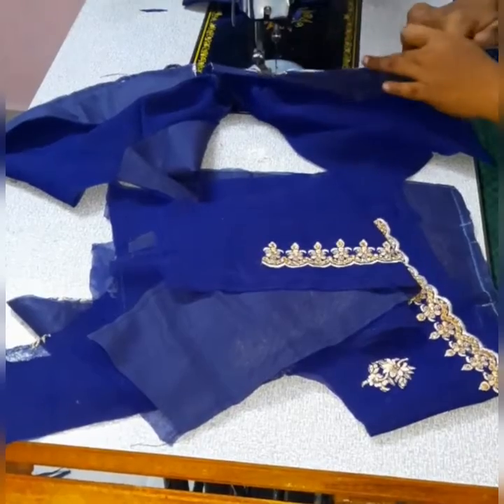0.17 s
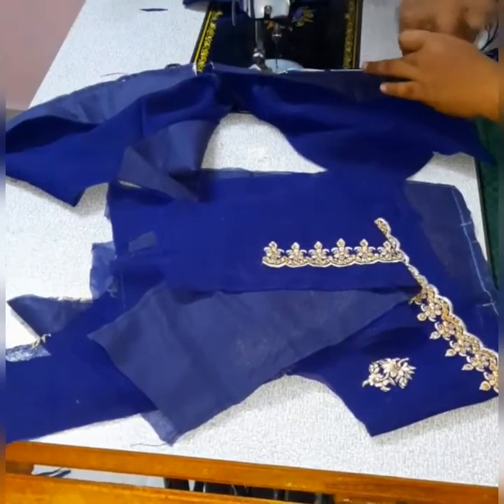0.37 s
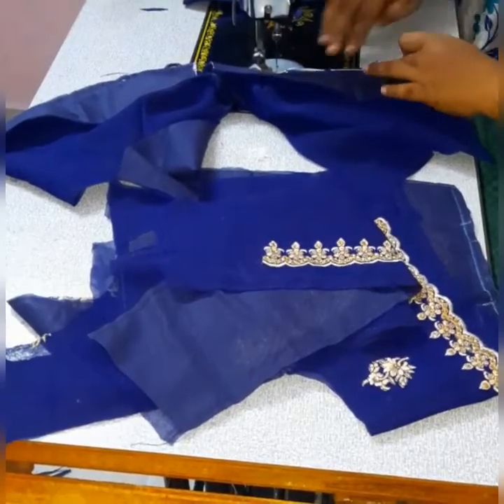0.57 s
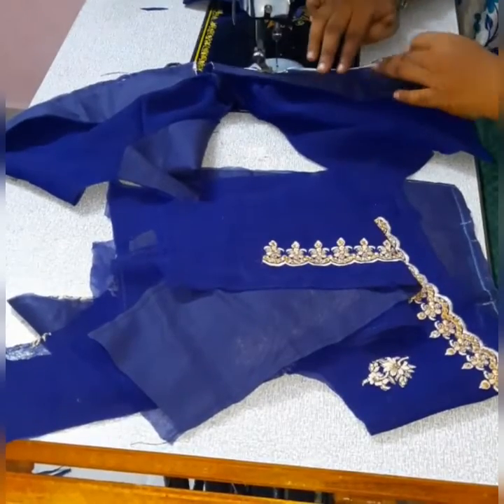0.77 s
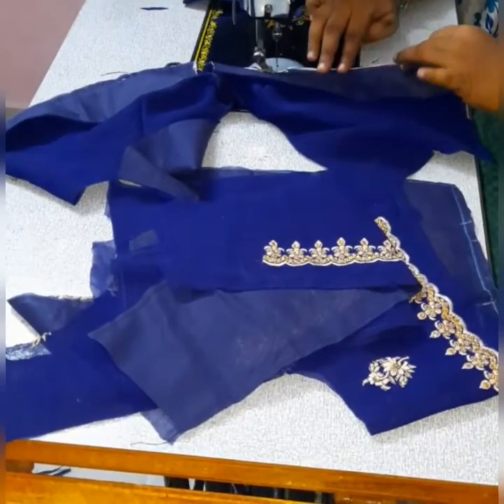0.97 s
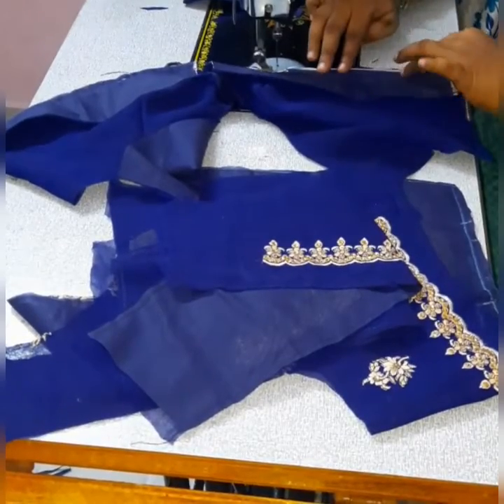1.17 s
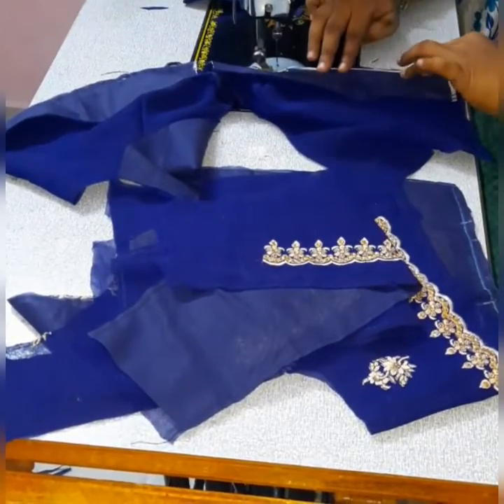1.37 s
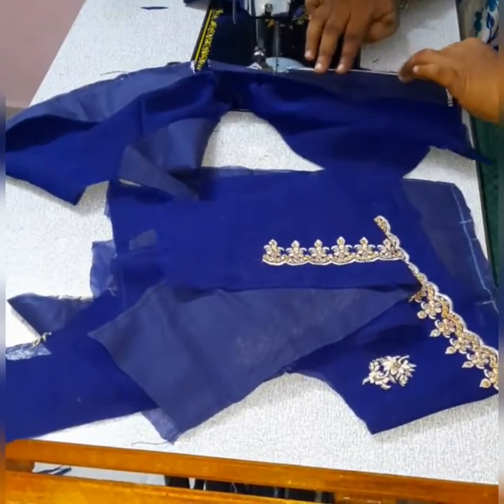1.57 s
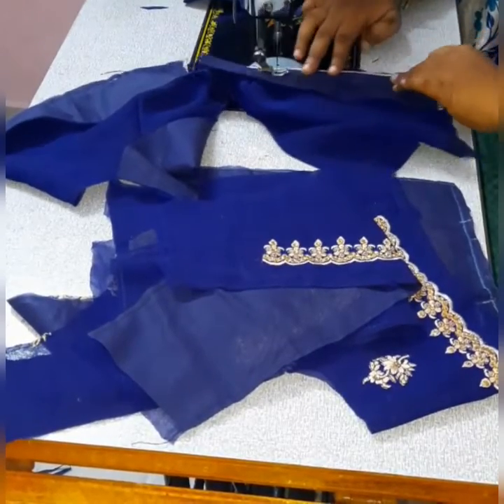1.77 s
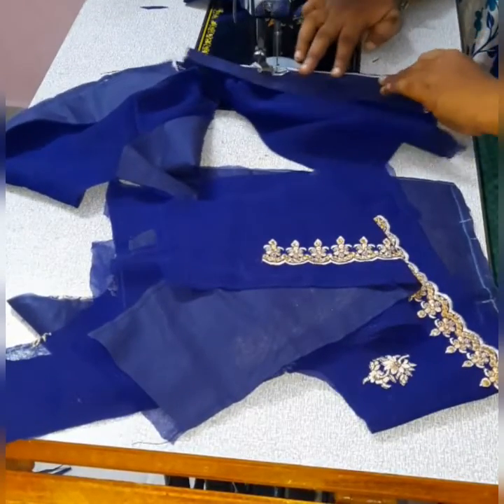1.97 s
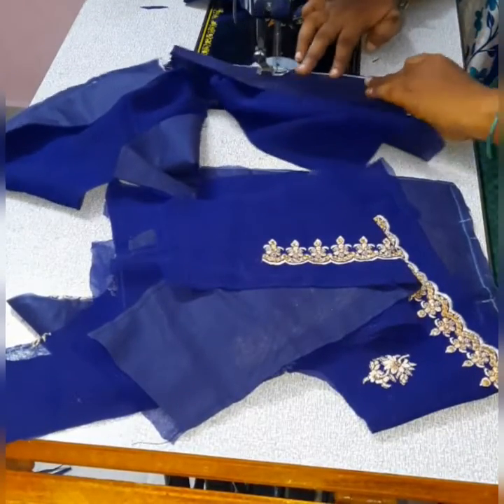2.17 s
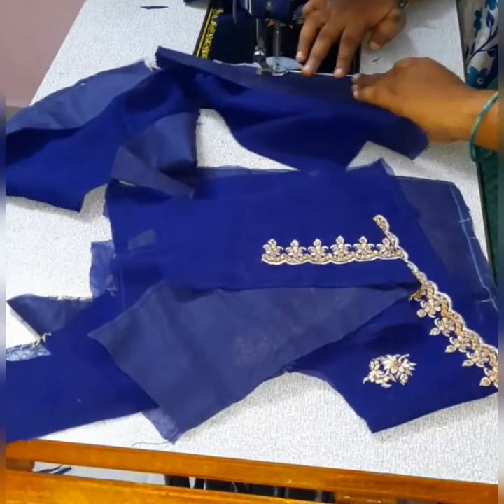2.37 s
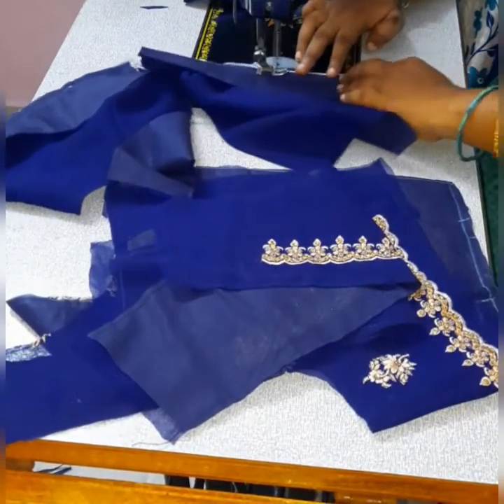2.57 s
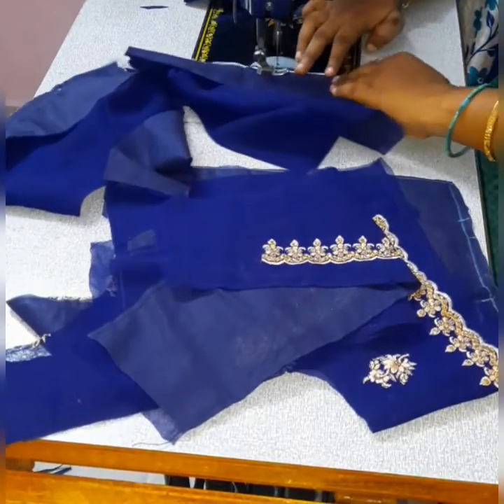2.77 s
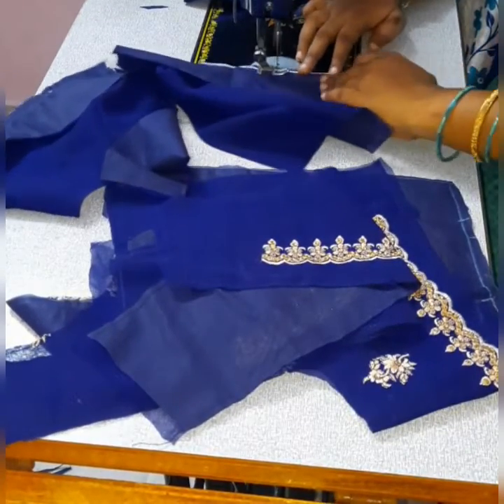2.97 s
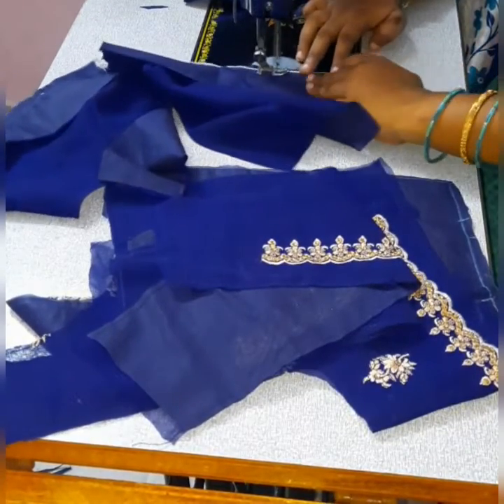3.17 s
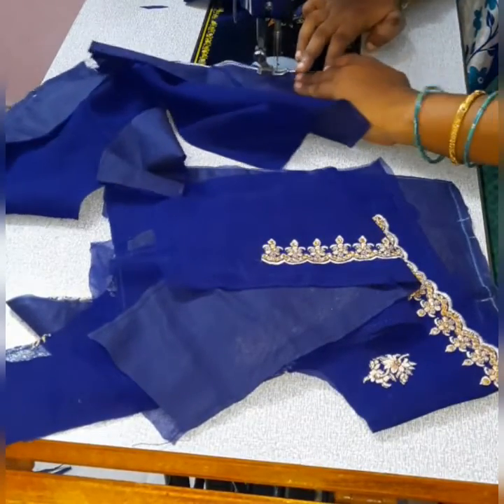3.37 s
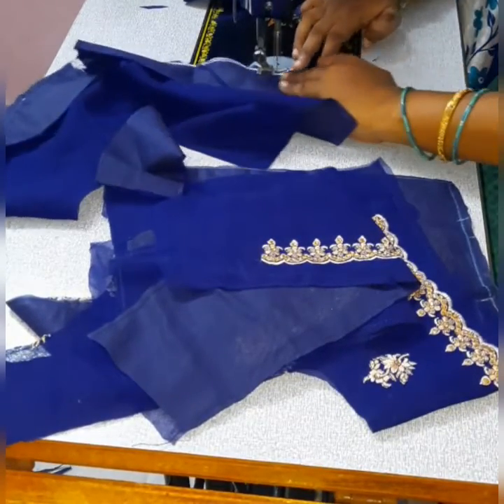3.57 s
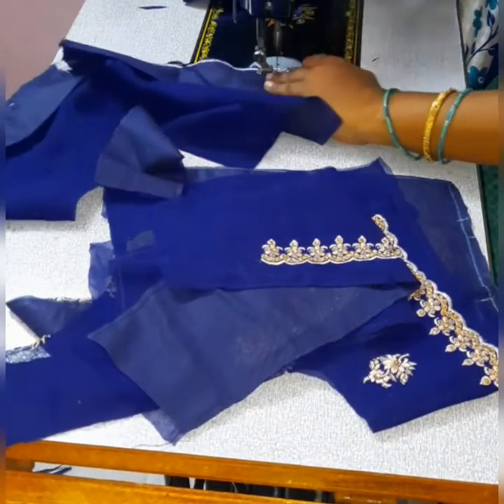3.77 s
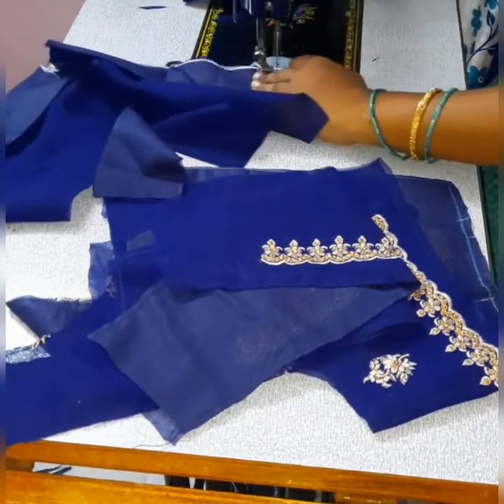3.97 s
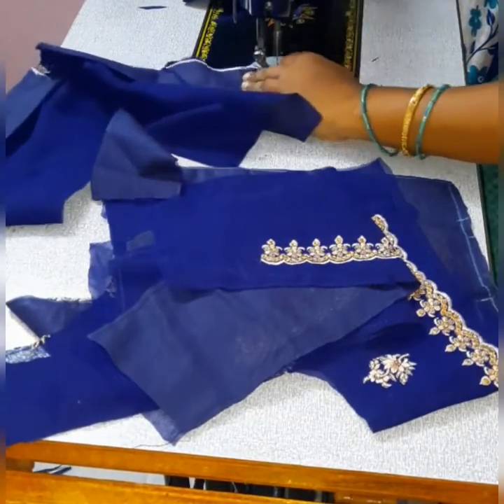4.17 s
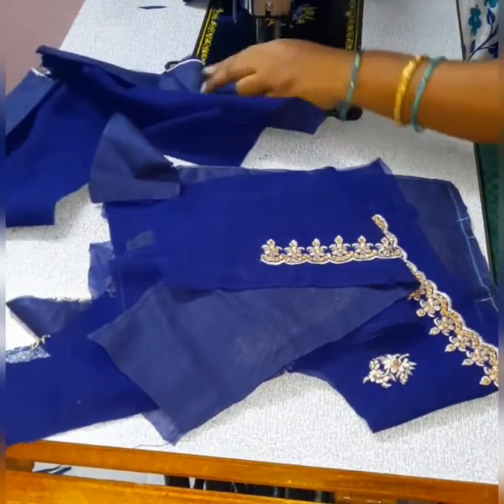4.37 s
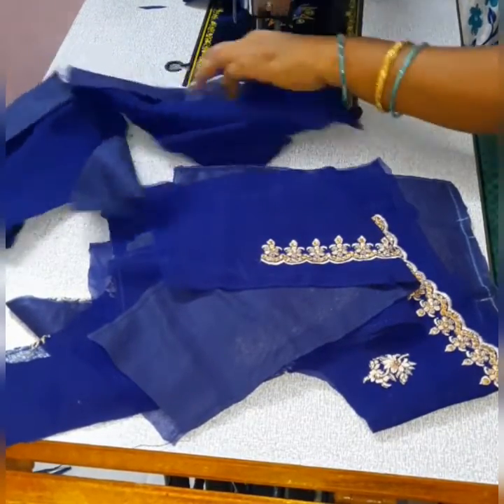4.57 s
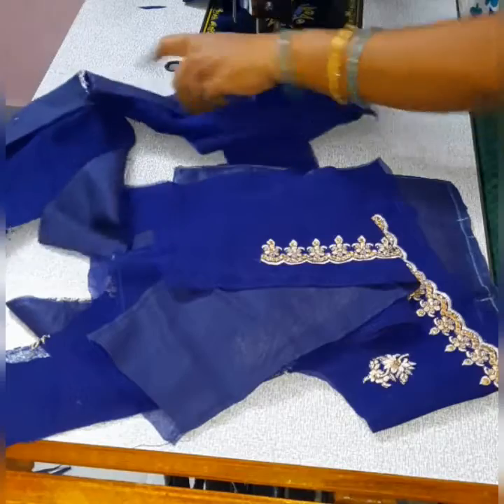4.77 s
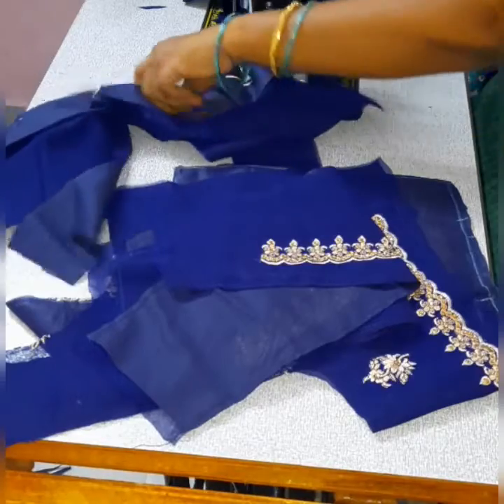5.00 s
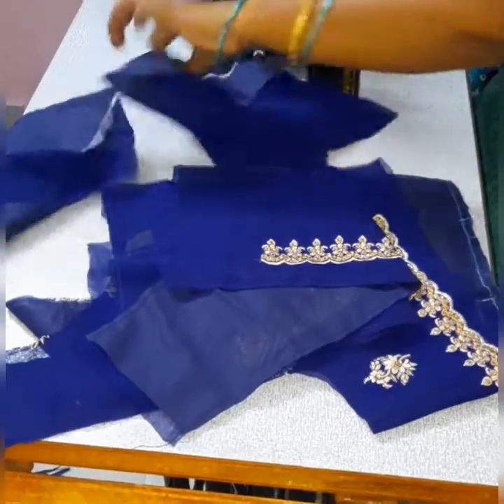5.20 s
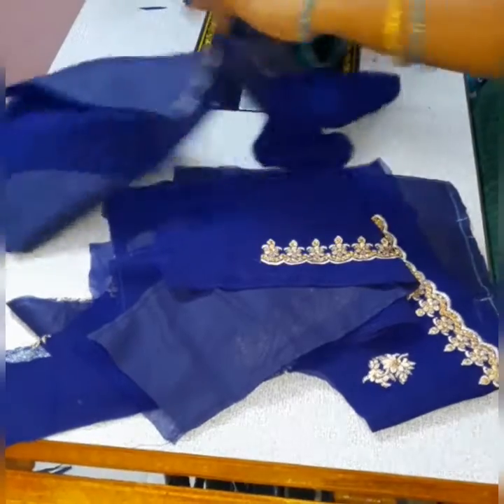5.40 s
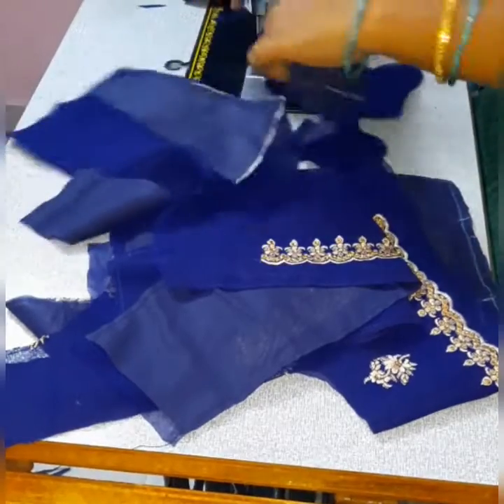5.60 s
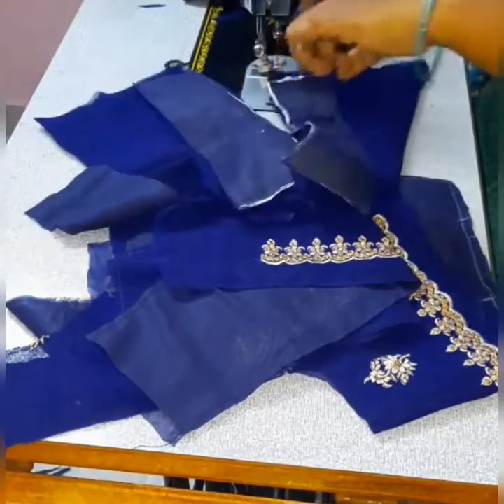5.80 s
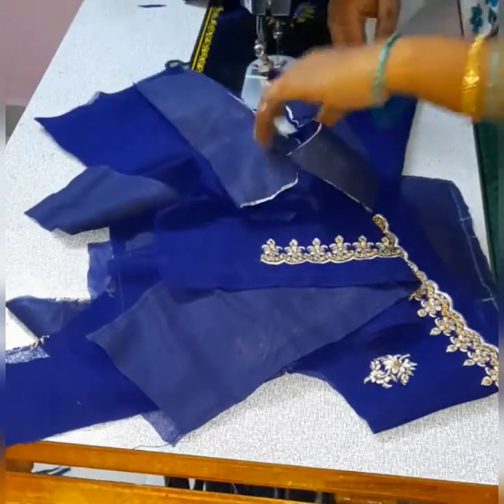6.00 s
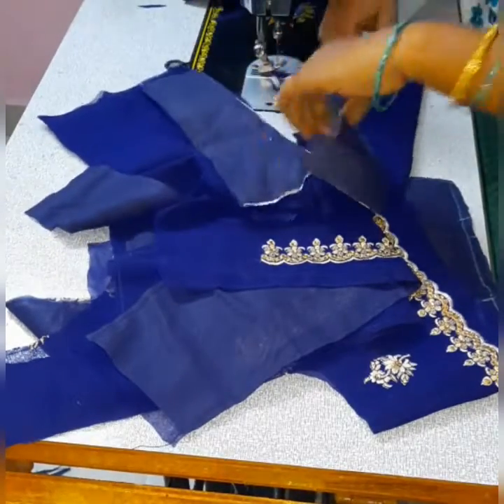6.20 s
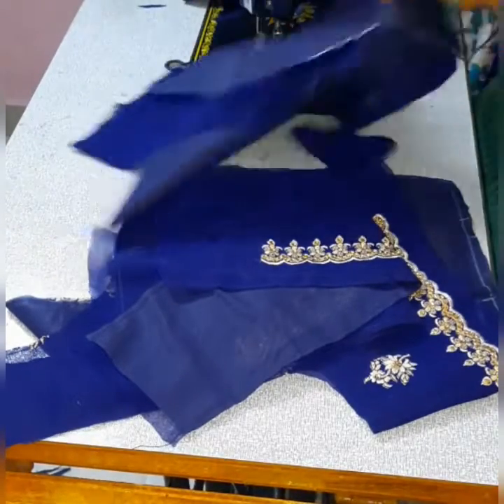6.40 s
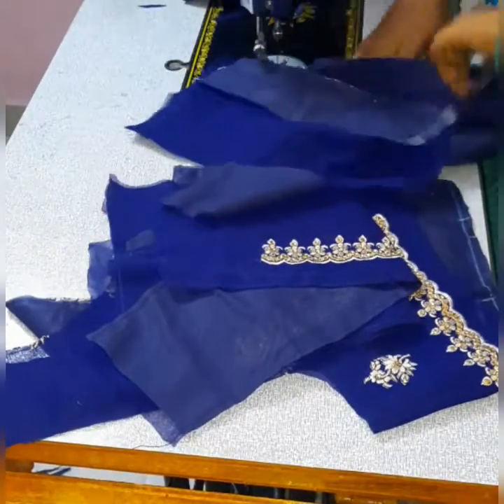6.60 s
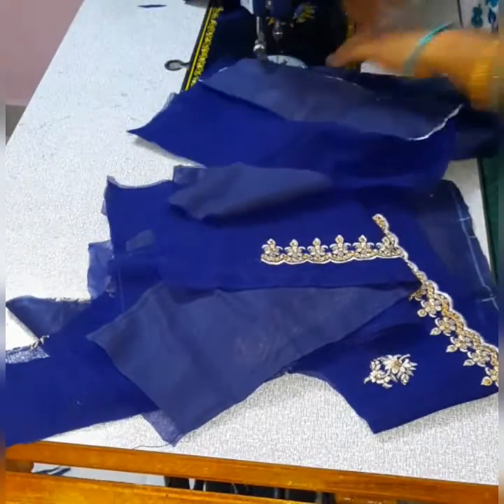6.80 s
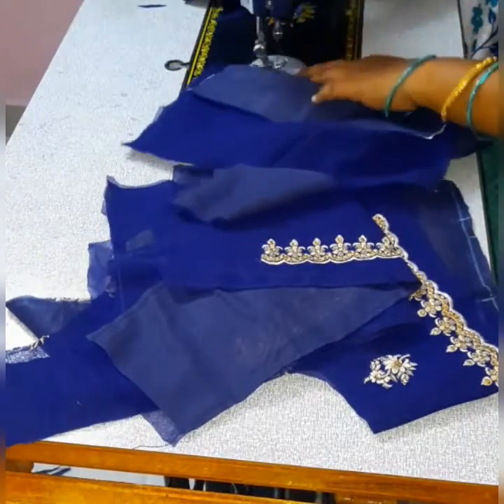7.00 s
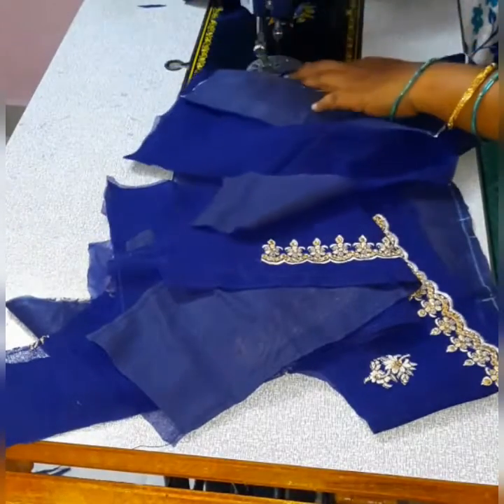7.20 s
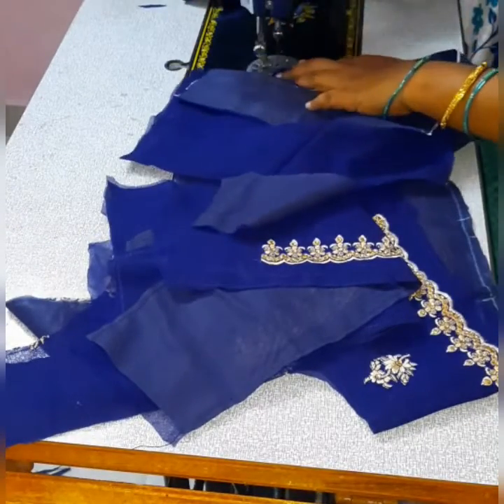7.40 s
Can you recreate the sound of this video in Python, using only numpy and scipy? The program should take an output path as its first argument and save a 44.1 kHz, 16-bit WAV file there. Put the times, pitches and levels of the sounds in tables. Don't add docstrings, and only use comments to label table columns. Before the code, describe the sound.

A foot-driven sewing machine runs one rough seam about two metres from a phone. Two soft wheel slaps precede it; then dense metallic ticking, wooden thumps and iron knocks rise and fall with the foot. It stops quickly, leaving a knee bump, a sharp lever snap, light bangle clinks, faint cloth crackle, low traffic hum, distant bird and insect notes, and slight hiss in a hard indoor space.

```python
import sys
import numpy as np
from scipy import signal
from scipy.fft import rfft, irfft, next_fast_len
from scipy.io import wavfile
from scipy.ndimage import uniform_filter1d

SR = 44100
rng = np.random.default_rng(int(sys.argv[2]) if len(sys.argv) > 2 else 0)


def field_ratio(decibels):
    return 10 ** (np.asarray(decibels, dtype=float) / 20)


def file_out(sig):
    cols = np.atleast_2d(sig).T
    lim = np.clip(cols, -1, 1)
    pcm = np.round(lim * 32767).astype(np.int16)
    wavfile.write(sys.argv[1], SR, pcm)


N = 328545
TIME = np.arange(N) / SR


def unit(x):
    return x / np.sqrt(np.mean(x ** 2))


def band(x, hz, kind):
    return signal.sosfilt(signal.butter(2, hz, kind, fs=SR, output="sos"), x)


def walk(rate):
    k = int(SR / rate)
    steps = np.repeat(rng.standard_normal(N // k + 1), k)
    return unit(uniform_filter1d(uniform_filter1d(steps, k), k)[:N])


def clicks(rate, spread_db):
    chance = rng.random(N) * SR / rate
    size = np.minimum(rng.exponential(size=N), 3.0)
    return (chance < 1) * np.sign(chance - .5) * field_ratio(spread_db * size)


def taps(s, db, slide_s=.001):
    force, t = np.zeros(N + SR), TIME[:SR // 8]
    grit = rng.standard_normal((len(s), len(t)))
    slide_s = np.maximum(np.broadcast_to(slide_s, len(s)), .0005)
    for k in range(len(s)):
        scrape = 0.14 * np.exp(-t / slide_s[k]) * grit[k]
        scrape[0] = 1
        force[int(s[k] * SR):][:len(t)] += field_ratio(db[k]) * scrape / np.sqrt(np.sum(scrape ** 2))
    return force[:N]


def swells(rows, edge_s, rest_db):
    power = field_ratio(2 * rest_db)
    for s, length, db in rows:
        rise = np.clip((TIME - s) / edge_s, 0, 1) ** 2
        fall = np.clip((s + length - TIME) / edge_s, 0, 1) ** 2
        power = power + field_ratio(2 * db) * rise * fall
    return np.sqrt(power)


def waver(hz, width, size, core=0):
    slow = unit(band(rng.standard_normal((2, size)), width / 2, "low"))
    phase = 2 * np.pi * np.cumsum(hz * np.ones(size)) / SR
    return unit((slow[0] + core) * np.cos(phase) + slow[1] * np.sin(phase))


def colour(points, size=4096):
    hz, db = np.transpose(points)
    gain = field_ratio(np.interp(np.log(np.fft.rfftfreq(size, 1 / SR) + 1), np.log(hz), db))
    cepstrum = irfft(np.log(gain))
    cepstrum[1:size // 2] *= 2
    cepstrum[size // 2 + 1:] = 0
    return irfft(np.exp(rfft(cepstrum)))


def pair(size):
    mid, side = rng.standard_normal((2, size))
    side = band(side, 474, "high") + 0.27 * side
    return np.array([mid + side, mid - side])


def steady(points):
    return unit(signal.fftconvolve(pair(N), colour(points)[None])[:, :N])


def ring(modes, path):
    t, out = TIME[:8192], 0
    power = np.mean(np.abs(rfft(path)) ** 2, axis=0)
    grid = np.fft.rfftfreq(path.shape[1], 1 / SR)
    for hz, width, db in modes:
        dip = np.average(power, weights=1 / (1 + (2 * (grid - hz) / width) ** 2))
        sine = np.exp(-np.pi * width * t) * np.sin(2 * np.pi * hz * t)
        out = out + field_ratio(db) * np.sqrt(width / dip) * sine
    lowest_hz = 0.82 * modes[0][0]
    return band(band(out, lowest_hz, "high"), lowest_hz, "high")


ROOM_T60_LOW_S, ROOM_T60_HIGH_S, ROOM_SPLIT_HZ, TAIL_FADE_S = 0.58, 0.55, 1400, 0.94


def heard(force, body, direct_db=-12, left_db=3.0, reach=0.8, count=3):
    t, size, total = TIME[:SR * 2 // 5], next_fast_len(N + SR), 0
    spot = rng.integers(count, size=N // 64 + 1).repeat(64)[:N]
    for k in range(count):
        echoes = pair(len(t)) * field_ratio(-150 * t * (1 / reach - 1))
        low = band(echoes, ROOM_SPLIT_HZ, "low")
        path = low * field_ratio(-60 * t / ROOM_T60_LOW_S) + (echoes - low) * field_ratio(-60 * t / ROOM_T60_HIGH_S)
        path = path * field_ratio(-10 * (t / TAIL_FADE_S) ** 2)
        path = path / np.sqrt(np.sum(path ** 2) / 2)
        path[:, 0] += field_ratio(direct_db)
        response = ring(body, path) if len(body[0]) == 3 else colour(body)
        path = signal.fftconvolve(path, response[None])
        path = path / np.sqrt(np.sum(path ** 2) / 2)
        total = total + rfft(force * (spot == k), size) * rfft(path, size)
    return irfft(total, size)[:, :N] * field_ratio(np.array([[left_db], [-left_db]]) / 2)


def forces(table=0, bed=0, arm=0, rattle=0, stand=0):
    return np.array([part + np.zeros(N) for part in (table, bed, arm, rattle, stand)])


# (time [s], load on table [dB], on bed [dB], on arm [dB], easing off [s])
PUSHES = [(1.535, 13.5, 3.5, 15, 0.073), (1.603, 11, 5.5, 13.5, 0.12), (1.997, 2.5, 5.5, 11, .08),
          (2.208, 2, 7, 9.5, 0.068), (2.44, 6.5, 6.5, 3.5, 0.062), (2.551, 10, 4, 7.5, 0.077),
          (3.202, 0.5, -2.5, -8.5, 0.025), (3.328, 3, 7, 6.5, .1), (3.566, -1.5, 8, 6.5, .05),
          (3.709, 14, 1.5, 8.5, 0.1314), (4.062, 6, 1.2, 8.5, 0.041), (4.227, 10, 5.5, 10.5, 0.076),
          (4.325, -0.5, 0.5, -3, 0.031), (4.53, 6, -1.5, 9, 0.083)]


def treadle_load():
    rise_s = .05
    shape = [np.exp(-((TIME - row[0]) / np.where(TIME < row[0], rise_s, row[4])) ** 2) for row in PUSHES]
    return np.array(PUSHES)[:, 1:4].T @ shape


# (time [s], stitches per second [Hz])
STITCH = [(1.47, 8.7), (2.0, 8.5), (2.55, 9.8), (3.05, 7.06), (3.65, 10.0), (4.1, 8.17), (4.62, 6.26)]
# (time [s], level [dB])
PACE = [(1.47, -50), (1.61, -37), (1.79, -37), (2.262, -32), (3.21, -36), (3.7, -30.5), (4.03, -38.5),
        (4.43, -40.5), (4.62, -55)]
PART_DB = [5.7, 0.98, 0.54, 2.2]
PART_SLOPE = [1.03, 1.05, 1.47, 1.19]


def running_works():
    middle_db, stop_db_per_s = -31.5, 249
    s, db = np.transpose(PACE)
    pace = np.interp(TIME, s, db) - middle_db - stop_db_per_s * np.maximum(TIME - s[-1], 0)
    wood, plate, iron = treadle_load()
    loads = (wood, plate, iron, 0.15 * iron)
    levels = [field_ratio(middle_db + part + slope * pace + load) * (TIME > s[0])
              for part, slope, load in zip(PART_DB, PART_SLOPE, loads)]
    table, bed, arm, rattle = levels

    turn = np.cumsum(np.interp(TIME, *np.transpose(STITCH)) * (1 + .04 * walk(6))) / SR
    crowd = .35 + np.exp(-(turn % 1) / .09) + .7 * np.exp(-((turn + .48) % 1) / .09)
    crowd = crowd / np.mean(crowd)

    def ticks(rate, spread_db, crowding):
        return unit(clicks(rate * crowd ** crowding, spread_db) * crowd ** (crowding / 2))

    belt = waver(626.8 + 28 * plate, 110, N) * field_ratio(-13 + 0.11 * plate)
    shake = rattle * field_ratio(-2.5 + 0.31 * wood - 0.5 * walk(16))
    return forces(
        table=table * ticks(400.0, 2.0, .7) * field_ratio(-3.5),
        bed=bed * (ticks(807, 3.2, .9) + belt),
        arm=arm * ticks(1089, 2.7, 1.1) * field_ratio(-2.0),
        rattle=rattle * ticks(3528, 2.1, .55),
        stand=shake * ticks(292.0, 4.0, .45) * field_ratio(-2.5))


# (time [s], peak [dB])
THUMPS = [(1.517, -26), (1.559, -23), (1.601, -6.5), (1.694, -11), (1.758, -14), (1.991, -16), (2.03, -15),
          (2.066, -14), (2.153, -17), (2.203, -14.5), (2.269, -13), (2.343, -29), (2.387, -21),
          (2.526, -15), (2.565, -13), (2.639, -15), (2.725, -11.5), (2.795, -17), (2.843, -35),
          (2.908, -17.5), (3.008, -13), (3.072, -15), (3.108, -24), (3.158, -27), (3.215, -25),
          (3.285, -16), (3.342, -23.5), (3.373, -23), (3.415, -15.5), (3.458, -16), (3.485, -25),
          (3.516, -15), (3.538, -18), (3.587, -24.5), (3.638, -10.5), (3.691, -6), (3.736, -13),
          (3.795, 1.5), (3.857, -15), (3.963, -22), (4.03, -29), (4.078, -20), (4.214, -21.5), (4.376, -26),
          (4.484, -28)]
# (time [s], peak [dB])
SETTLE = [(4.508, -23), (4.54, -31), (4.575, -36), (4.62, -43), (4.655, -40), (4.696, -44), (4.77, -47.5),
          (4.815, -46), (4.88, -47)]


def table_thumps():
    s, db = np.transpose(THUMPS + SETTLE)
    return forces(table=taps(s, db + 20.0, .009))


# (time [s], peak [dB], bed re peak [dB])
KNOCKS = [(1.4948, -39, -13), (1.5166, -20, -5), (1.5362, -15.5, -4.5), (1.5795, -30, 9), (1.598, -24, 11),
          (1.8276, -28.5, -0.5), (1.9036, -24.5, 1), (1.9565, -23, -5.5), (2.1395, -25, 5),
          (2.2036, -32, -7), (2.3544, -20, -15), (2.4621, -23, 2), (2.4898, -14, -5), (2.541, -9.5, -6),
          (2.6397, -20, 8), (2.7749, -15.5, -18), (2.8333, -25, -6), (2.9309, -30.5, 7), (3.0256, -25, -29),
          (3.0621, -22, 2), (3.095, -20.5, -4), (3.1568, -22.5, 0), (3.2289, -16, -7),
          (3.3076, -18.5, -5.5), (3.4099, -18.5, -8), (3.518, -21, -2.5), (3.5542, -28.5, -6.5),
          (3.5931, -24.5, -9), (3.6435, -13, -4.5), (3.6762, -11.5, -5.5), (3.6966, -14.5, -2),
          (3.7266, -6, -9.5), (3.7771, -13, -1.5), (3.9239, -23.5, -10), (3.9606, -28, -11),
          (4.048, -28, -2), (4.1852, -28, -8), (4.2202, -26, -4), (4.253, -24, -9), (4.3244, -18, -10),
          (4.4631, -34, -14)]


def arm_knocks():
    s, db, bed_db = np.transpose(KNOCKS)
    give_s = .003
    return forces(arm=taps(s, db + 18.0, give_s), bed=taps(s, db + bed_db + 22.0, give_s),
                  rattle=taps(s, db + 6.5, give_s))


# (time [s], peak [dB])
JOLTS = [(1.501, -40), (1.568, -23), (1.617, -19.5), (1.685, -25.5), (1.864, -35.5), (1.925, -28),
         (1.998, -20), (2.064, -24.5), (2.176, -26), (2.236, -41), (2.325, -27), (2.382, -26), (2.539, -23),
         (2.646, -34), (2.704, -46), (2.754, -31), (2.809, -31.5), (2.861, -34), (2.964, -32), (3.035, -28),
         (3.118, -49), (3.259, -32), (3.307, -27), (3.393, -36), (3.497, -33), (3.596, -22), (3.697, -16),
         (3.896, -19), (4.094, -36), (4.31, -26)]


def stand_jolts():
    s, db = np.transpose(JOLTS)
    return forces(stand=taps(s, db + 24.0))


# (time [s], peak [dB], slide [s])
THUDS = [
    (0.597, -50, 0.024),
    (5.178, -42.5, 0.024),
    (5.21, -63, 0.029),
    (5.336, -34.5, 0.033),
]


def knee_thuds():
    s, db, slide_s = np.transpose(THUDS)
    return forces(stand=taps(s, db + 22.0, slide_s))


# (resonance [Hz], width [Hz], level [dB])
TABLE = [(270, 56, -22.5), (293.5, 13, 4.5), (310, 26, 0), (331.8, 19, 11.5), (388, 28, 1)]
# (resonance [Hz], width [Hz], level [dB])
BED = [(501.4, 70, 2.5), (595.5, 53, -4), (681, 39, -16), (774, 240, -3.5), (886, 150, -10.5),
       (1021, 140, -4)]
# (resonance [Hz], width [Hz], level [dB])
ARM = [(1260, 82, -0.5), (1384, 40, 0.5), (1497, 210, 5.5), (1560, 14, -8.5), (1665, 86, -11),
       (1860, 45, -6), (2130, 19, -16.5), (2252, 110, -13), (2474, 380, -20), (3640, 15, -18),
       (4300, 150, -20)]
# (frequency [Hz], density [dB per Hz])
RATTLE = [(1180, -13.5), (2000, -1), (3390, -5.5), (3770, -3.5), (4110, -8), (4480, -4), (4970, -7.5),
          (6340, -8), (6850, -9), (8590, -8.5), (10800, -14.5), (13700, -11.5), (15100, -13), (15900, -24)]
# (resonance [Hz], width [Hz], level [dB])
STAND = [(66, 30, -19.5), (100, 28, -8), (138.3, 15, 11.5), (200, 21, -16)]


def machine_body(table, bed, arm, rattle, stand):
    wood = heard(table, TABLE, -3.0, .8, 0.88)
    iron = heard(bed, BED, -5.0, 1.8) + heard(arm, ARM, -6.0, 1.3)
    loose = heard(rattle, RATTLE, -7.0, 0.72)
    return wood + iron + loose + heard(stand, STAND, -2.0, 0.1, 0.6, count=2)


# (frequency [Hz], density [dB per Hz])
WEAVE = [(350, -21.5), (600, 0), (905, -1.5), (1520, -1.5), (3470, -2.5), (8940, -9), (9710, -23.5),
         (11600, -9.5), (15900, -20)]
# (time [s], peak [dB], table re peak [dB], arm re peak [dB], slide [s])
TOUCHES = [(0.5704, -69, 12, -23, 0.0055), (0.579, -71, 22, -25, 0.0089), (0.8436, -38, -4, -3, 0.0095),
           (1.4736, -66, -16, -21, 0.016), (1.4896, -29, -15.5, -10, 0.02), (5.002, -51.5, -14, -28, 0.011),
           (5.1895, -60, 11.5, -7, 0.0087), (5.207, -67.5, 17, -5, 0.006), (5.2836, -63, -9, 8, 0.013),
           (5.3273, -35, -6, -27, 0.02), (5.4606, -48, 2.5, -5, 0.029), (5.9146, -45, -16, -27, 0.012),
           (5.94, -46, -22, -7.5, 0.0091), (6.378, -50, -8, -30, 0.026), (6.421, -39.5, -24, -34.5, 0.014),
           (6.4398, -40.5, -14, -29.5, 0.013), (6.545, -53.5, -7.5, -16, 0.0092),
           (7.1307, -51, -26, -14, 0.0019), (7.258, -56, -20, -28, 0.002), (7.349, -70, -11, 10, 0.012)]


def hand_touches():
    s, db, table_db, arm_db, slide_s = np.transpose(TOUCHES)
    push = forces(table=taps(s, db + table_db + 25, slide_s), bed=taps(s, db + arm_db + 25.0, slide_s),
                  arm=taps(s, db + arm_db + 22.0, slide_s))
    fingers = taps(s, db + 20, slide_s)
    return push, heard(fingers, WEAVE, -10.5, 0, 0.66, count=2)


# (resonance [Hz], width [Hz], level [dB])
LEVER = [(358, 55, 1.5), (634, 230, -5), (1037, 20, 5.5), (1250, 180, 1), (1844, 28, -0.5),
         (2470, 600, -13), (3170, 44, -2), (3500, 230, -11), (4650, 420, -15), (6550, 4200, 5)]
# (time [s], ring peak [dB], crack [dB])
SNAP = [
    (5.284, -58, -72),
    (5.615, -31.5, -34.5),
]


def lever_snap():
    s, db, crack_db = np.transpose(SNAP)
    jar = forces(table=taps(s, db + 22.0, .01), bed=taps(s, db + 16, .01),
                 rattle=taps(s, crack_db + 31.5, .012))
    lever = taps(s, db + 34.5, [.006, .028])
    return jar, heard(lever, LEVER, -13.5, 1.3, 0.56, count=1)


# (resonance [Hz], width [Hz], level [dB])
WHEEL = [(153, 11, 4.5), (313, 24, 9.5), (546, 210, -2.5), (1060, 23, 2), (1213, 26, -3), (1470, 80, 1),
         (1560, 52, 8.5), (2210, 110, 4.5), (2410, 170, -5), (3250, 200, -22), (4100, 370, -7.5),
         (4500, 260, -18), (7000, 4100, -11), (11800, 1200, -9)]
# (time [s], peak [dB], slide [s])
SLAPS = [
    (0.77, -34, 0.008),
    (0.7989, -33, 0.0105),
    (0.845, -47.5, 0.015),
    (1.067, -56.5, 0.025),
]


def wheel_slaps():
    s, db, slide_s = np.transpose(SLAPS)
    return heard(taps(s, db + 29.0, slide_s), WHEEL, -12, 1.0, 0.75, count=1)


# (resonance [Hz], width [Hz], level [dB])
LATCH = [(980, 48, 7), (1890, 41, -3), (3250, 46, -4), (4500, 260, 10), (5600, 900, -7)]
# (time [s], peak [dB])
TICKS = [
    (5.331, -35.5),
]


def latch_tick():
    s, db = np.transpose(TICKS)
    return heard(taps(s, db + 22.5), LATCH, -10.0, 0.0, 0.6, count=1)


# (resonance [Hz], width [Hz], level [dB])
BANGLES = [(6140, 2000, -7), (8700, 1200, 0), (11530, 1500, 5), (12530, 1800, -17), (12600, 600, -32),
           (14700, 1800, -5)]
# (time [s], peak [dB])
CLINKS = [(0.57, -54), (0.846, -54), (1.4719, -32.5), (4.324, -43), (4.54, -39.5), (4.9216, -59),
          (5.0247, -53.5), (5.052, -53.5), (5.328, -50), (5.45, -56), (5.614, -34), (5.68, -45),
          (5.912, -45), (5.9772, -49), (6.0355, -49), (6.512, -54), (6.53, -45.5), (6.545, -59),
          (6.5857, -63), (6.9728, -59), (7.131, -62)]


def bangle_clinks():
    s, db = np.transpose(CLINKS)
    return heard(taps(s, db + 26.0, .01), BANGLES, -8.0, -0.2, 0.67, count=1)


# (start [s], length [s], level [dB])
DRAGS = [(0.75, 0.41, -78), (1.0, 0.53, -68.5), (4.6, 0.16, -54.5), (5.02, 0.43, -65.5), (5.38, 0.64, -62),
         (5.8, 0.3, -60.5), (6.26, 0.44, -68.5), (6.72, 0.38, -77), (7.0, 0.6, -74)]


def cloth_drags():
    crackle = unit(clicks(3000., 1.4))
    return heard(crackle * swells(DRAGS, 0.11, -79), WEAVE, left_db=-0.5, count=2)


# (start [s], length [s], frequency [Hz], width [Hz])
FAR = [(4.7, .6, 3695, 55), (6.2, .12, 2650, 100), (6.56, .17, 1700, 260), (6.73, .14, 1720, 260),
       (6.87, .16, 1680, 170), (7.01, .14, 1700, 130), (7.2, .38, 3690, 90), (7.27, .17, 1760, 150),
       (6.5, .5, 4750, 200), (0, .6, 4750, 150), (7.33, .08, 1000, 300), (6.72, .45, 900, 400),
       (6.1, 1.4, 9300, 400), (7.15, .09, 3680, 90)]
FAR_DB = [-73, -84, -72, -75.5, -71.5, -69, -72, -70, -82, -92, -68.5, -76, -83, -80]


def far_calls():
    out = np.zeros((2, N + SR))
    for (s, length, hz, width), db in zip(FAR, FAR_DB):
        t = TIME[:int(length * SR)]
        swell = np.clip(np.minimum(t, length - t) / (.25 * length + .02), 0, 1)
        tones = np.array([waver(hz, width, len(t), .6 + 25 / width) for ear in range(2)])
        out[:, int(s * SR):][:, :len(t)] += field_ratio(db) * swell * tones
    return out[:, :N]


# (frequency [Hz], density [dB per Hz])
HUM = [(71, -48), (120, -22), (151, -0.5), (193, -11), (246, -13.5), (279, -3), (338, -1.5), (479, -10),
       (573, -18), (631, -16), (839, -21), (1500, -32), (1950, -46.5), (3300, -120)]
# (time [s], level [dB])
TOWN = [(0, -54), (.3, -59), (.55, -55.5), (.85, -59.5), (1.4, -58.5), (4.7, -55), (4.98, -68.5),
        (5.5, -56), (5.9, -53.5), (6.15, -69.5), (6.85, -65), (7.1, -69), (7.45, -66.5)]


def town_hum():
    return steady(HUM) * field_ratio(np.interp(TIME, *np.transpose(TOWN)) + 0.91 * walk(14))


# (frequency [Hz], density [dB per Hz])
DEEP = [(15, -39), (25, -11), (48, 0), (70, -18), (91, 3.5), (119, -12), (130, -7.5), (170, -17.5),
        (290, -120)]
# (start [s], length [s], level [dB])
RUMBLES = [(-.1, 0.48, -62), (.7, 0.4, -60), (1.6, 0.39, -48), (2.9, 0.42, -54), (4.2, 0.52, -53.5),
           (4.9, 0.44, -56.5), (5.5, 0.38, -57.5), (6.35, 0.57, -65), (7.15, .5, -70)]


def far_wheels():
    return steady(DEEP) * swells(RUMBLES, 0.12, -67.0) * field_ratio(1.5 * walk(3.6))


# (frequency [Hz], density [dB per Hz])
HISS = [(590, -11.5), (1000, 4.5), (1150, -5.5), (1520, -11.5), (2070, 0.5), (2520, -6), (2970, -8),
        (5230, -8.5), (9020, -11), (15900, -22)]


def microphone_hiss():
    return steady(HISS) * field_ratio(-76.0)


def scene():
    touch, fingers = hand_touches()
    jar, lever = lever_snap()
    push = running_works() + table_thumps() + arm_knocks() + stand_jolts() + knee_thuds() + touch + jar
    hands = fingers + lever + wheel_slaps() + latch_tick() + bangle_clinks() + cloth_drags()
    background = far_calls() + town_hum() + far_wheels() + microphone_hiss()
    return machine_body(*push) + hands + background


def low_pass(x):
    return signal.sosfilt(signal.butter(12, 16980, fs=SR, output="sos"), x)


def record(dry):
    rounded = 1.123 * np.tanh(band(dry, 34, "high") / 1.074)
    top_cut = signal.ellip(10, .2, 70, 15600, fs=SR, output="sos")
    return low_pass(signal.sosfilt(top_cut, rounded))


dry = scene()
out = record(dry)
file_out(out)
```